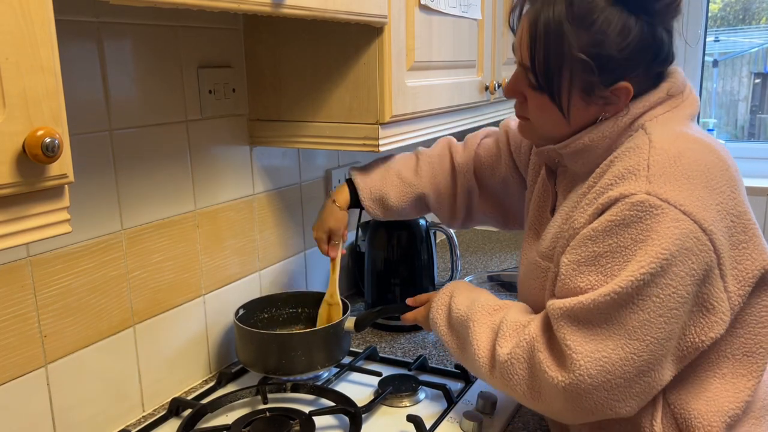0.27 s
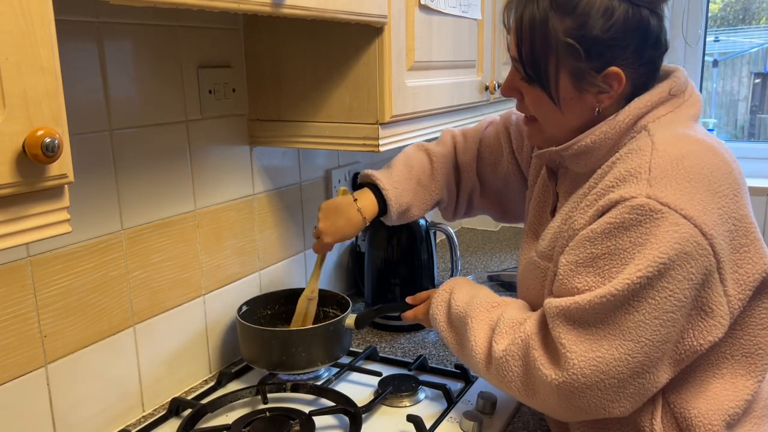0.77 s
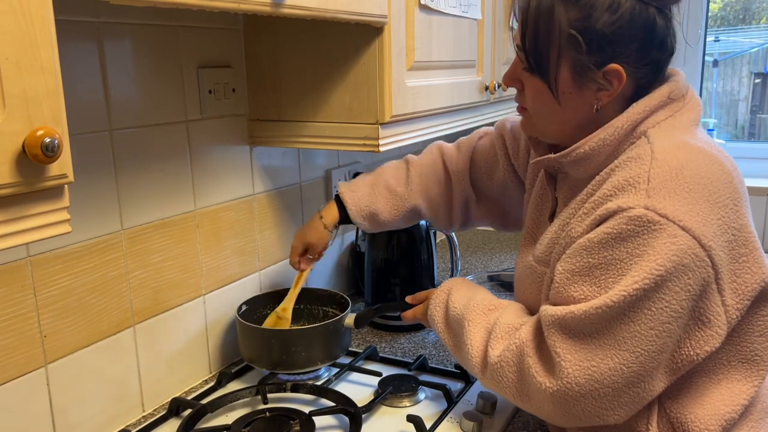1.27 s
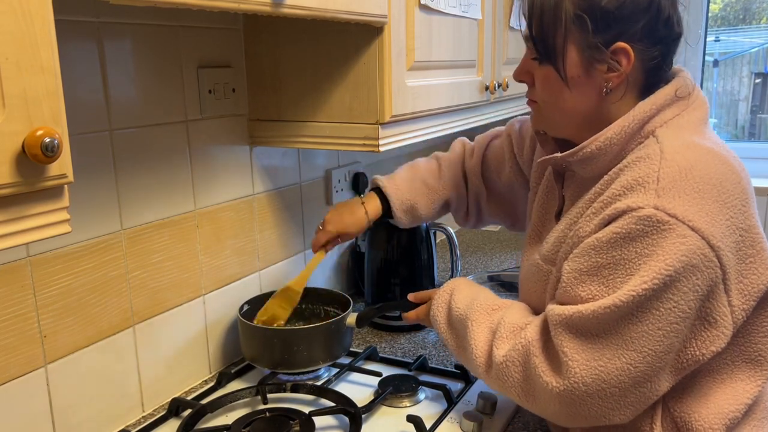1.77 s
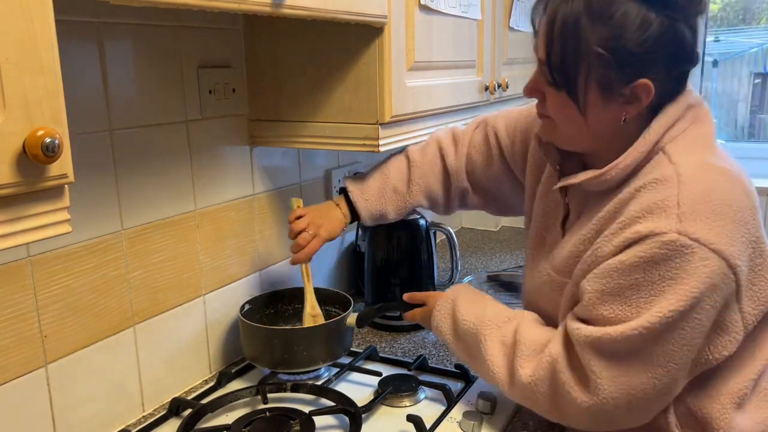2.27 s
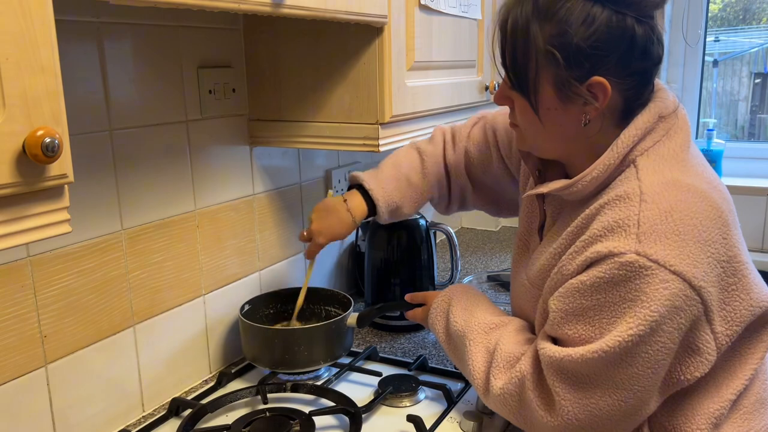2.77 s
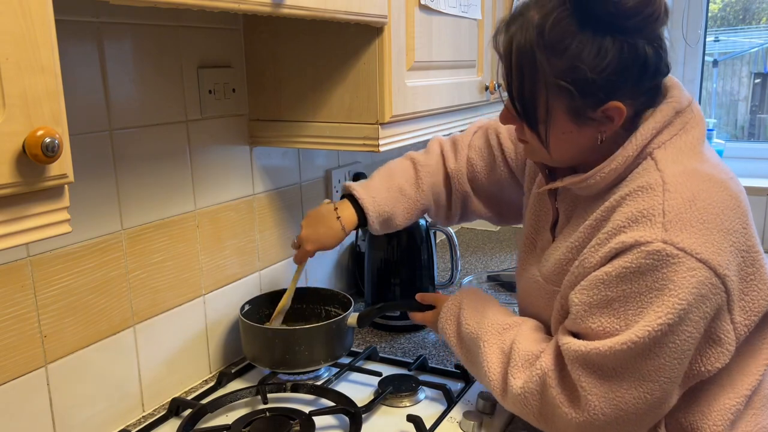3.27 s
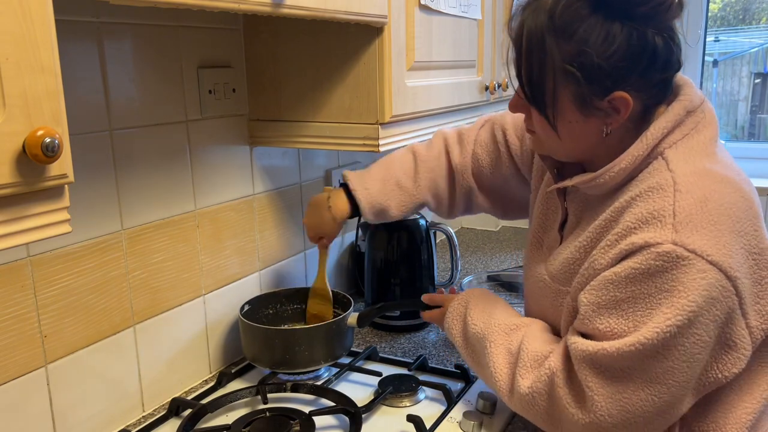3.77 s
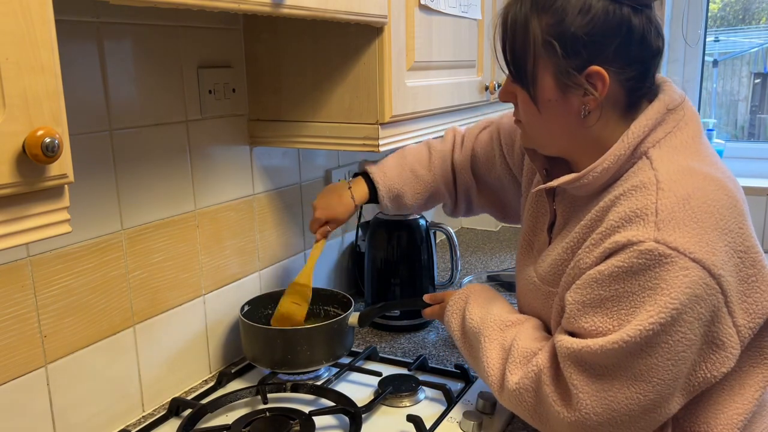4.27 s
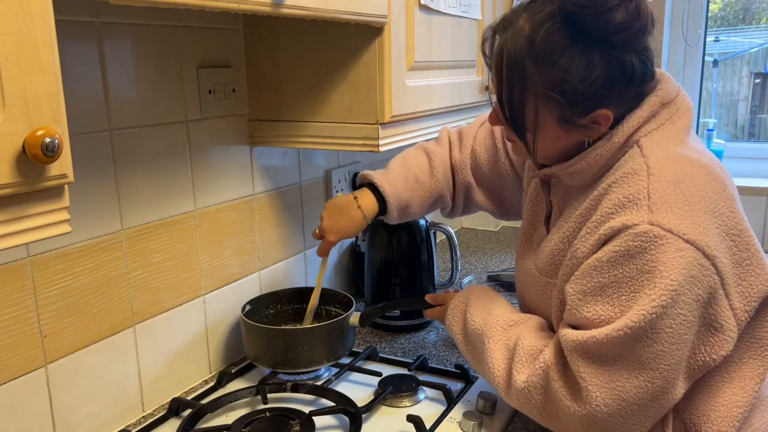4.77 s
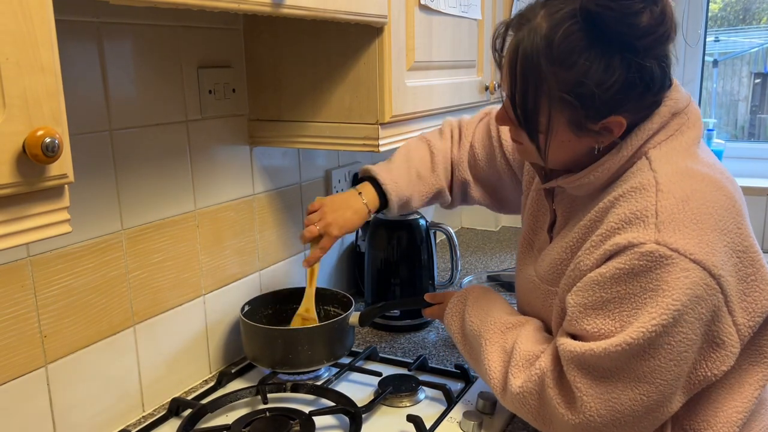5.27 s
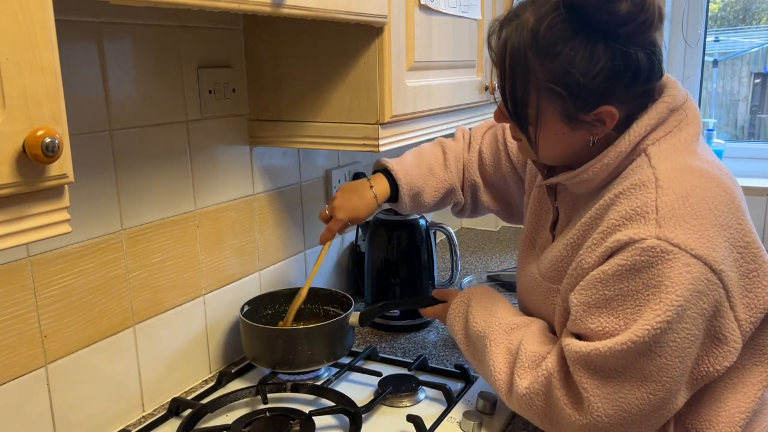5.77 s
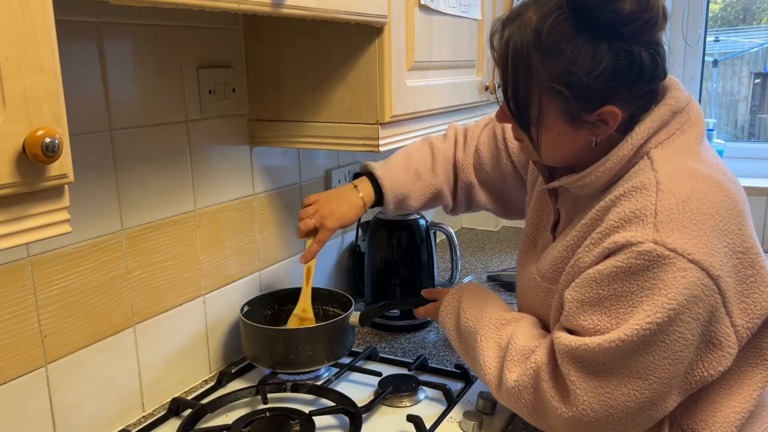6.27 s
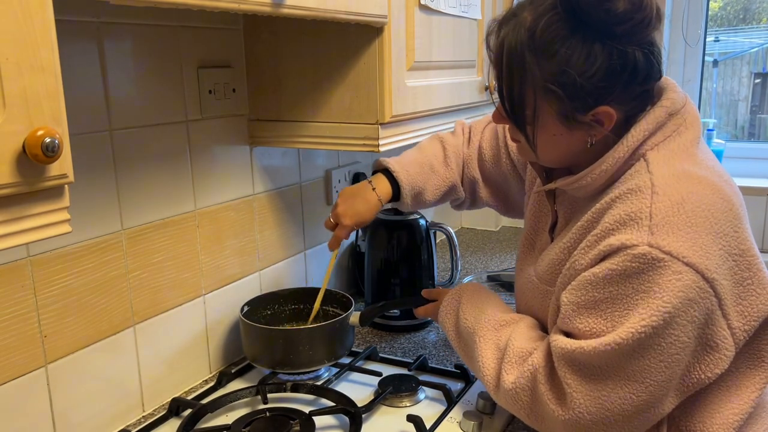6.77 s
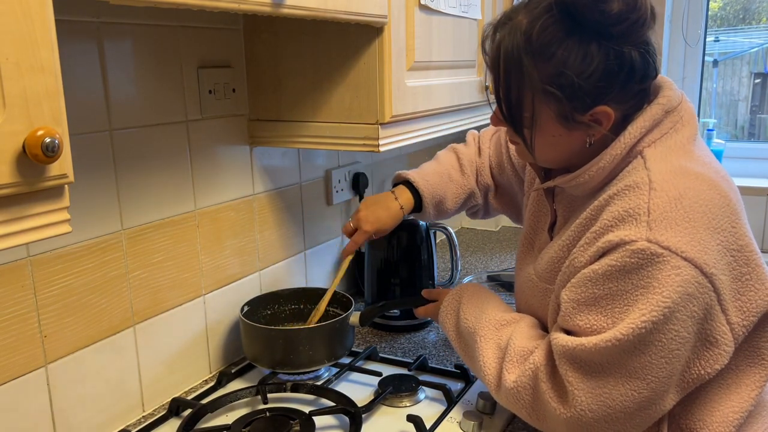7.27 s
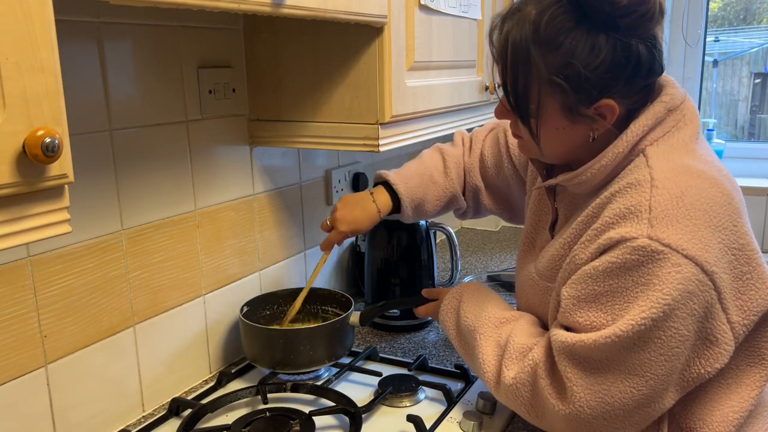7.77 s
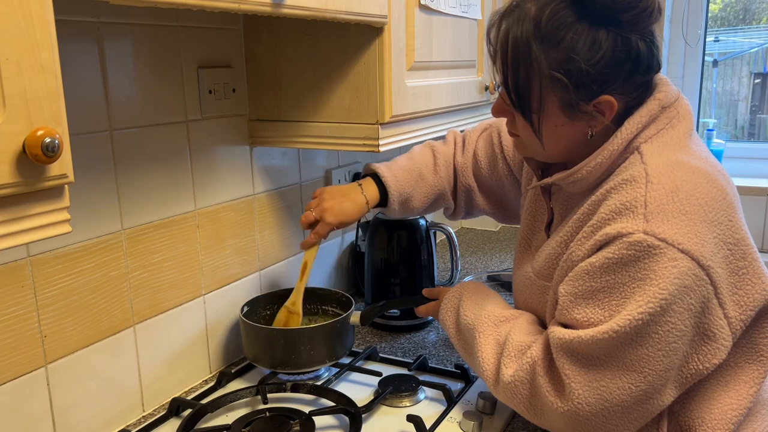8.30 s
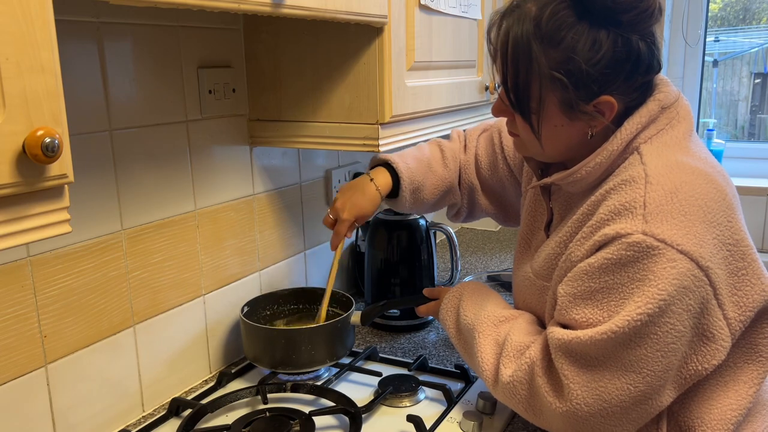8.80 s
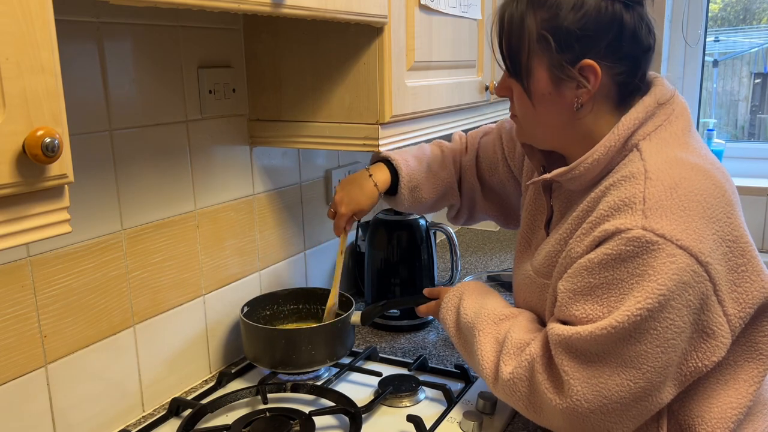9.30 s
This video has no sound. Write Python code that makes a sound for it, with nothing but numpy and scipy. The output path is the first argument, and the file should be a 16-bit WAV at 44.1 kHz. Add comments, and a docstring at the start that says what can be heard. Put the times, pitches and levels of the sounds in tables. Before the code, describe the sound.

A wooden spoon stirs a soft mixture in a metal saucepan, with dry scrapes, sharp little squeaks, light knocks and a faint sizzle over a low hum.

```python
"""In a small kitchen, a wooden spoon stirs a melting, faintly sizzling mixture in a saucepan.
The spoon's rasp is coloured grain noise; its squeaks are stacks of partials that roughen as wood slips on metal.
Knocks are short noise clumps through spoon and pan resonances; the mixture pops, squelches and sizzles.
The pan rocks on its grate with low decaying tones, the hob thuds, and a faint motor hum lies underneath."""
import sys
import numpy as np
from scipy import signal
from scipy.fft import rfft, irfft, next_fast_len
from scipy.io import wavfile
from scipy.ndimage import uniform_filter1d

SR = 44100
rng = np.random.default_rng(int(sys.argv[2]) if len(sys.argv) > 2 else 0)


def wrap_up_sound(samples):
    """Save the sound to the file named by the first command line argument, as 16-bit audio."""
    columns = np.atleast_2d(samples).T
    # keep every value between -1 and 1, then stretch to whole-number steps
    tamed = np.clip(columns, -1, 1)
    steps = np.round(tamed * 32767).astype(np.int16)
    wavfile.write(sys.argv[1], SR, steps)


N = 420713
TIME = np.arange(N) / SR
EDGE_HZ = 15950  # upper edge of the whole scene

# Levels in the tables are before each layer's own trim; colours only set relative balance.
# strokes of the spoon over the base: t/s of greatest pressure, length/s, rasp level/dB, low rub level/dB
STROKES = [(0.2, 0.056, -47.5, -57), (0.305, 0.14, -62, -60), (.58, .04, -66, -64), (0.87, .035, -56, -59),
           (1.127, 0.05, -50, -58), (1.384, 0.031, -49.5, -63), (1.457, 0.096, -52.5, -53),
           (1.574, 0.026, -40.5, -48.5), (1.667, .04, -65, -51.5), (1.906, 0.15, -61, -58),
           (2.084, 0.013, -51, -59), (2.22, 0.084, -58, -63), (2.349, 0.05, -47, -55),
           (2.499, 0.019, -44.5, -52), (2.531, 0.031, -39, -51), (2.77, 0.037, -55, -61),
           (2.858, 0.033, -50.5, -50), (2.975, 0.08, -58, -59), (3.134, 0.039, -53.5, -61),
           (3.802, 0.046, -43.5, -52), (3.888, 0.098, -50, -55), (4.129, 0.039, -42.5, -56),
           (4.893, 0.025, -50.5, -55.5), (4.993, 0.028, -47, -57), (5.057, 0.031, -41.5, -57),
           (5.128, 0.088, -47, -53.5), (5.317, 0.06, -42.5, -53.5), (5.79, 0.037, -45, -50),
           (6.128, 0.038, -45.5, -48.5), (6.178, .025, -51, -60), (6.256, 0.045, -55.5, -53.5),
           (6.326, 0.04, -40, -49), (6.407, 0.049, -50, -50.5), (6.723, 0.033, -53, -57.5),
           (7.47, 0.073, -44.5, -56), (7.521, 0.065, -46, -60), (7.814, .04, -49, -52.5),
           (8.04, .06, -56, -62), (8.19, 0.032, -56, -66), (8.329, .025, -47.5, -55),
           (8.366, 0.028, -46, -71), (8.774, 0.022, -48, -52.5), (9.132, 0.078, -55.5, -60),
           (9.267, 0.037, -57, -73), (9.529, .04, -45.5, -71)]
# the spoon gliding between strokes: rasp level/dB, rub level/dB
GLIDE_LEVELS = (-69.5, -64)
# shares of its length over which a stroke swells and eases
SWELL, EASE = 0.5, 0.5
# colour of the rasp: f/Hz, density/dB per Hz
RASP_COLOUR = [(400, -45), (800, -1), (1250, -5.5), (1900, -4), (2500, 3.5), (3500, 1.5), (4300, -10.5),
               (8000, -8.5), (16000, -40)]
# colour of the low rub through the mixture: f/Hz, density/dB per Hz
RUB_COLOUR = [(25, -17), (70, -20.5), (160, -10.5), (240, -4.5), (320, -4.5), (440, 0), (620, -3.5),
              (820, -15), (1100, -27.5), (2000, -26)]
# resonances of the filled pan: f/Hz, width/Hz, level/dB
PAN_MODES = [(417, 34, 8), (742, 29, 4.5), (805, 110, 5.5), (956, 16, 4.5), (1243, 77, 6), (1390, 76, 10.5),
             (1589, 23, 7), (1684, 59, 11.5), (2078, 55, 6), (3130, 94, -9), (3270, 45, 1), (3716, 130, 3),
             (6260, 120, -11)]
# one curve a squeak: t/s, slip rate f/Hz, roughness (held to 0-1), level/dB
SQUEAK_CURVES = [
    [(0.483, 1295, 0.4, -48.2), (0.488, 1213, 0.17, -26.5), (0.498, 1214, 0.12, -28.5),
     (0.508, 1170, 0.05, -50), (0.53, 1140, 0.3, -56)],
    [(0.546, 1306, 0.6, -37.5), (0.552, 1192, 0.2, -44), (0.571, 1118, 0.34, -56), (0.578, 1226, 0.3, -31),
     (0.587, 1042, 0.36, -30.5), (0.605, 1083, 0.4, -42.5), (0.613, 1020, 0.3, -55)],
    [(0.666, 1034, 0.6, -36), (0.672, 1110, 0.4, -34), (0.682, 1233, 0, -32.5), (0.69, 1260, 0.2, -47),
     (0.712, 1090, 0, -53)],
    [(0.743, 1760, 0.4, -43), (0.748, 1577, 0.2, -38), (0.77, 1658, 0.08, -38.5), (0.8, 1604, 0.06, -38),
     (0.826, 1418, 0.1, -38.5), (0.842, 1120, 0.1, -45.5), (0.858, 998, 0.5, -41), (0.87, 883, 0.65, -35.5),
     (0.885, 970, 1, -54)],
    [(1.049, 1617, 0.8, -41), (1.056, 1514, 0.6, -32.5), (1.073, 1270, 0.4, -31), (1.088, 1530, 0.5, -38),
     (1.104, 1803, 0.25, -41.5), (1.132, 1340, 0.5, -58)],
    [(1.135, 1456, 0.1, -46.6), (1.152, 1823, 0, -45), (1.192, 1745, 0, -38), (1.203, 1820, 0.05, -52),
     (1.216, 1880, 0.08, -38), (1.234, 1650, 0.2, -40.6), (1.248, 1520, 0.2, -59)],
    [(1.362, 1422, 0.87, -45.5), (1.38, 1605, 0.77, -37.5), (1.398, 1840, 0.07, -43),
     (1.415, 2010, 0.03, -28), (1.445, 1992, 0.02, -29), (1.463, 1850, 0.33, -42.5),
     (1.487, 1950, 0, -31.5), (1.51, 1939, 0.03, -36.5), (1.524, 1860, 0.1, -61)],
    [(1.975, 1420, 0.2, -43), (1.984, 1704, 0.06, -29.5), (1.996, 2450, 0.65, -29),
     (2.006, 2160, 0.8, -31.5), (2.016, 1900, 0.2, -39)],
    [(2.023, 1390, 0.2, -46), (2.026, 1385, 0.05, -24), (2.035, 1413, 0.27, -20.9),
     (2.0405, 1687, 0.1, -11), (2.046, 1990, 0.1, -24), (2.055, 2206, 0.5, -29), (2.061, 2060, 0.4, -31)],
    [(2.744, 1810, 0.84, -36.5), (2.756, 1694, 1.2, -27), (2.767, 1794, 0.15, -23.5), (2.785, 1890, 0, -31),
     (2.798, 1854, 0.05, -23), (2.813, 1917, 0.04, -27.5), (2.854, 1887, 0, -25.5),
     (2.871, 1626, 0.74, -34.5), (2.89, 1404, 0.7, -44.6)],
    [(2.925, 1450, 0.5, -39), (2.935, 1518, 0.05, -37), (2.951, 1424, 0.27, -52), (2.965, 1630, 0.1, -41.6),
     (2.982, 1665, 0.1, -42), (3.005, 1624, 0.25, -48), (3.025, 1620, 0.5, -52.2)],
    [(4.67, 1560, 0.5, -37), (4.674, 1500, 0.4, -46), (4.681, 1550, 0.6, -57)],
    [(4.683, 1500, .6, -43), (4.689, 1600, 0.6, -42), (4.699, 1650, 0.8, -55)],
    [(4.837, 1686, 1.1, -50), (4.845, 1823, 0.77, -33.5), (4.856, 1950, 1, -47)],
    [(5.754, 1740, 0.94, -37.5), (5.778, 1683, 1.06, -30.5), (5.824, 1733, 0.9, -30),
     (5.838, 1515, 0.8, -32.5), (5.852, 1764, 0.2, -24), (5.866, 1813, 0.13, -23.5),
     (5.883, 1841, 0.07, -20.5), (5.912, 1765, 0.04, -24.5), (5.931, 1827, 0, -24),
     (5.947, 1858, 0.02, -23), (5.962, 1718, 0.05, -31), (5.999, 1660, 0.4, -34.5), (6.014, 1830, 0, -23.3),
     (6.027, 1852, 0, -27), (6.037, 1740, 0.03, -25), (6.055, 1870, 0, -28), (6.082, 1750, 0.03, -28.5),
     (6.097, 1676, 0.5, -35), (6.116, 1533, 0.5, -39), (6.14, 1435, 0.84, -45)],
    [(6.939, 1610, 1.1, -40), (6.95, 1780, 0.45, -25), (6.962, 1927, 0, -35), (6.973, 1880, 0.1, -41),
     (6.981, 1743, 0.66, -25.5), (7.007, 1832, 0.4, -26.7), (7.03, 1898, 0.17, -42.5),
     (7.048, 1894, 0.44, -44.8)],
    [(7.211, 1800, 0.5, -53), (7.218, 1813, 0.15, -28), (7.234, 1816, 1, -31), (7.243, 1310, 0.32, -29.5),
     (7.262, 1530, 0.47, -30), (7.28, 1580, 0.24, -22.5), (7.302, 1722, 0.23, -25.5),
     (7.324, 1590, 0.15, -20.5), (7.345, 1584, 0, -23.5), (7.366, 1580, 0.1, -23.5),
     (7.384, 1806, 0.23, -24), (7.404, 1902, 0.05, -28.5), (7.435, 1928, 0.06, -26), (7.468, 1982, 0, -24),
     (7.5, 1946, 0, -26.5), (7.53, 1936, 0, -29), (7.558, 1894, 0.37, -30.5), (7.575, 1840, 0.3, -48)],
    [(7.655, 1730, 0.53, -44), (7.672, 1806, 0.13, -33.5), (7.698, 1870, 0, -39.5),
     (7.73, 1795, 0.18, -29.5), (7.765, 1738, 0.06, -33.5), (7.795, 1668, 0.15, -36.6),
     (7.82, 1630, 0.3, -48)],
]
# how the spoon is held and where it touches, one row a squeak:
# brightness/dB per octave, ring f/Hz, ring level/dB, shrill f/Hz, shrill level/dB, left minus right level/dB
GRIPS = [(-8, 2600, 17.5, 12300, 30, 1), (0.5, 1870, 28.5, 11200, 19, -0.5),
         (-4.5, 2060, 17.5, 11200, 22, 0.5), (-4, 1920, 22, 14800, 44, -2), (1.5, 4040, 14, 8800, 11.5, 1),
         (-5, 1700, 10.5, 10000, 15, 2), (0, 2460, 23.5, 9900, 12.5, -1), (-4.5, 3200, 7, 7500, 2, -2),
         (-4, 3400, 18.5, 6850, 15.5, -1.5), (2.5, 4530, 23, 9400, 13, 1.7), (5, 4650, 4, 8900, -14, 0),
         (2, 4650, 8, 8900, 6, -1), (1.5, 1600, 1, 8000, 6, -2), (1.5, 1800, 11.5, 6400, 9, -1),
         (6.5, 5650, 10.5, 9740, 7, 1), (1, 5170, 14, 10700, 18, 1), (6, 4860, 18, 10280, 10.5, 1),
         (-3.5, 3920, 11, 13000, 11, .5)]
# colour that all squeaks share: f/Hz, level/dB
SQUEAK_COLOUR = [(1000, 2.2), (2000, -0.5), (2700, -0.5), (3700, 2.5), (4200, -3.5), (4750, 1.5),
                 (5100, -4), (5500, 4.5), (6100, -15), (7200, -0.5), (8200, -10.5), (9600, -8.5),
                 (11000, -16), (13000, -21.5), (16000, -35)]
# harder pressing brightens a squeak: dB per octave for each dB of level
PRESS_TILT = 0.14
# extra ring while the wood catches and lets go: dB at full roughness
CATCH_DB = 6
# dry hiss of the wood tearing loose during a squeak: f/Hz, density/dB per Hz
HISS_COLOUR = [(2000, -19), (4500, -3), (7000, -3), (10500, -8), (12500, 0.5), (14500, -4), (16000, 5)]
# short knocks and flicks of the spoon: t/s, length/s, blow level/dB, hardness/dB per octave, wet splash level/dB
KNOCKS = [(0.047, .025, -54, -3.5, -57), (.07, 0.011, -48, 3.5, -37.5), (0.144, 0.034, -48, -2, -45.5),
          (0.22, 0.019, -60.5, 9, -46.5), (0.342, 0.0058, -58, 13.5, -69), (0.388, 0.022, -51, -0.5, -74),
          (0.635, 0.017, -55, -2, -57), (1.625, 0.0095, -35.5, 0, -30), (1.706, 0.012, -46, 3, -38),
          (1.785, 0.018, -50, 2.5, -37.5), (1.871, 0.013, -46.5, 4, -36.5), (2.171, .01, -48, 0, -53),
          (2.596, 0.013, -53, 5.5, -62), (2.923, .014, -47, 3.5, -46), (3.062, 0.015, -46, 0, -41.5),
          (3.115, .004, -46, -5, -45), (3.257, 0.014, -60.5, -3, -56), (3.627, 0.0067, -64.5, 16, -57),
          (4.159, .013, -46, 3, -38), (4.68, 0.0076, -53, 11.5, -43), (4.797, 0.018, -51.5, 6, -39),
          (4.837, 0.03, -51.5, 3, -48), (5.067, 0.0046, -38.5, -0.5, -62), (5.241, .007, -44.5, 0.5, -56),
          (5.979, 0.017, -50, -3.5, -56), (6, 0.0069, -33, 2, -49), (6.215, 0.011, -50.5, 0.5, -52),
          (6.442, 0.017, -45, 2.5, -35), (6.521, .018, -49.5, 2, -45), (6.604, 0.0039, -48, 8.5, -31.5),
          (6.651, 0.02, -55, 9, -44.5), (7.801, 0.032, -48, 4.5, -37), (7.872, 0.014, -48.5, 0, -57),
          (8.012, .013, -59, 7, -44), (8.048, 0.0059, -46.5, -0.5, -57), (8.234, 0.011, -61.5, 14, -42.5),
          (8.398, 0.0053, -42, 2, -39), (8.593, .0055, -52, 6, -60), (9.225, 0.007, -55, 17, -36),
          (9.441, 0.014, -49.5, 2, -35), (9.487, .009, -53, 9, -59), (9.517, 0.0075, -42.5, 3.5, -42)]
# where pan body, wall, wood and splash sound in a knock: low f/Hz, high f/Hz
KNOCK_BANDS = [(330, 1380), (1150, 3630), (3000, 5800), (5300, 12500)]
# resonances of the wooden spoon when it knocks: f/Hz, width/Hz, level/dB
SPOON_MODES = [(1490, 97, 0), (1950, 200, 9), (2880, 1300, 4.5), (3890, 360, -1), (4750, 94, 0),
               (6230, 430, -4), (11600, 1300, -5.5)]
# the pan rocks on the grate: t/s, level/dB
ROCKS = [(1.636, -36), (1.711, -38.5), (2.192, -61), (3.068, -45), (5.857, -46), (6.007, -37), (6.221, -46),
         (6.527, -40.5)]
# tones of the grate: f/Hz, level/dB, t60/s
GRATE_MODES = [(467, 6, 0.047), (448, -8.5, 0.17), (362, -10, 0.13), (249.5, -6.5, 0.095)]
# dull pushes of the spoon into the hob: t/s, level/dB, pitch f/Hz
THUDS = [(2.082, -48, 126), (2.545, -55, 55), (5.765, -43, 85.1), (5.775, -43, 208), (5.808, -43, 53),
         (6.443, -53, 70)]
# sizzle as hot mixture is turned over and settles: t/s, level/dB
SIZZLE_CURVE = [(0, -52), (.4, -55), (1.2, -56), (1.6, -45.5), (2.1, -50.5), (2.65, -46.5), (2.95, -53),
                (3.6, -55), (4.1, -50), (4.7, -53.5), (5.1, -48), (5.7, -53.5), (6.2, -48), (6.8, -53),
                (7.5, -54), (7.7, -42.5), (8.2, -48.5), (9.53, -49)]
# colour of the sizzle: f/Hz, density/dB per Hz
SIZZLE_COLOUR = [(500, -4), (1500, -3.5), (3000, -2), (5500, 1), (8000, -1), (10500, 0), (13000, 0.5),
                 (16000, 0)]
# the motor comes up to speed: t/s, f/Hz
HUM_PITCH = [(0, 461), (.3, 482), (.6, 497), (.85, 500)]
# lines of the hum: multiple of the pitch, level/dB
HUM_LINES = [(1, 1), (2, -10.5)]
# the hum fades now and then: t/s, half length/s, depth/dB
HUM_DIPS = [(4.794, .04, -18), (7.196, 0.08, -30), (8.56, 0.054, -43), (8.938, 0.089, -32),
            (9.392, 0.056, -28)]
# likeness of left and right in all grain noise: f/Hz, likeness (0-1)
STEREO_LIKENESS = [(60, 0.6), (130, 0.32), (300, 0.86), (650, 0.75), (1400, 0.38), (2400, 0.52),
                   (4400, 0.04), (8000, 0), (15000, 0.12)]
# the kitchen's ring: f/Hz, t60/s
ROOM_DECAY = [(200, 0.15), (1500, 0.083), (5000, 0.096), (14000, 0.073)]


def amp(db):
    """Decibels to gain."""
    return 10 ** (np.asarray(db) / 20)


def unit(x):
    """Scales to rms 1."""
    return x / np.sqrt(np.mean(x ** 2) + 1e-20)


def read(points, hz):
    """Reads a spectrum on a log-frequency axis."""
    f, value = np.transpose(points)
    return np.interp(np.log(hz + 1), np.log(f + 1), value)


def follow(rows, t):
    """Every column of a curve table at the times t."""
    s, *columns = np.transpose(rows)
    return [np.interp(t, s, column) for column in columns]


def add(mix, s, sound):
    """Adds a sound into the mix at time s."""
    part = mix[..., max(round(s * SR), 0):][..., :sound.shape[-1]]
    part += sound[..., :part.shape[-1]]


def wander(size, hz):
    """Random drift of rms 1, rolling off smoothly around hz."""
    n = next_fast_len(size + 2000)
    slow = np.exp(-(np.fft.rfftfreq(n, 1 / SR) / hz) ** 2)
    drift = irfft(rfft(rng.standard_normal(n)) * slow, n)
    return unit(drift[:size])


def grains(size, colour, per_s, spread_db, wash):
    """Tiny random ticks over a wash of finer ones, coloured and heard at two microphones."""
    n = next_fast_len(size)
    hz = np.fft.rfftfreq(n, 1 / SR)
    tick_gain = amp(spread_db * np.minimum(rng.exponential(1, n), 4))
    ticks = (rng.random(n) < per_s / SR) * tick_gain
    left, other = rfft(rng.standard_normal((2, n)) * (unit(ticks) + wash))
    same = np.clip(read(STEREO_LIKENESS, hz), -1, 1)
    right = same * left + np.sqrt(1 - same ** 2) * other
    return unit(irfft(np.array([left, right]) * colour(hz), n)[:, :size])


def resonance_gain(modes, hz):
    """Resonant peaks standing out of an even response, summed as power."""
    peaks = sum(amp(db) ** 2 / (1 + (2 * (hz - f) / width) ** 2) for f, width, db in modes)
    return np.sqrt(.5 + peaks)


def pressure():
    """Gains of rasp and rub over time: each stroke swells and eases above a light glide."""
    t = TIME[::SR // 1000]
    power = amp(GLIDE_LEVELS)[:, None] ** 2 * np.ones(len(t))
    for s, length, *part_db in STROKES:
        u = (t - s) / length
        shape = 2 * np.exp(-np.logaddexp(-u / SWELL, u / EASE))
        power = power + (amp(part_db)[:, None] * shape) ** 2
    return [np.interp(TIME, t, np.sqrt(p)) for p in power]


def stirring(rasp, rub, rasp_db=-3.5, rub_db=-1, judder_db=3.0):
    """The grain of the wood ticks across the base; the pressure of the hand judders."""
    # firmer strokes judder more
    pressing = np.clip((20 * np.log10(rasp) + 63) / 12, .15, 1)
    judder = judder_db * pressing * wander(N, 62)

    def rasp_colour(hz):
        return amp(read(RASP_COLOUR, hz)) * resonance_gain(PAN_MODES, hz)

    def rub_colour(hz):
        return amp(read(RUB_COLOUR, hz)) * resonance_gain(PAN_MODES, hz)

    high = grains(N, rasp_colour, per_s=1000, spread_db=3.7, wash=0.66)
    low = grains(N, rub_colour, per_s=900, spread_db=1.9, wash=1.0)
    return high * rasp * amp(rasp_db + judder) + low * rub * amp(rub_db + judder)


def overtone(hz, rough, tilt_db, ring_hz, ring_db, shrill_hz, shrill_db,
             ring_width_hz=800, shrill_width_hz=1300):
    """Gain of a partial: the shared colour plus the two bands that the grip favours."""
    ring = (ring_db + CATCH_DB * rough) * np.exp(-((hz - ring_hz) / ring_width_hz) ** 2)
    shrill = shrill_db * np.exp(-((hz - shrill_hz) / shrill_width_hz) ** 2)
    tilt = tilt_db * np.log2(hz / 4000)
    return amp(read(SQUEAK_COLOUR, hz) + tilt + ring + shrill) * (hz < EDGE_HZ)


def squeak(rows, grip, jitter=0.0553, jitter_hz=420, shimmer_db=3.0, flutter_db=2.5,
           raggedness=0.62, edge_s=0.0018, lag_rad=1.65, sway_rad=0.36):
    """Stick and slip: a stack of partials, pure while the grip is steady, ragged as it catches and lets go."""
    t = np.arange(rows[0][0] - edge_s, rows[-1][0] + edge_s, 1 / SR)
    hz, rough, level_db = follow(rows, t)
    rough = np.clip(rough, 0, 1)
    slip_hz = hz * (1 + jitter * rough * wander(len(t), jitter_hz))
    phase = 2 * np.pi * np.cumsum(slip_hz) / SR

    partial_hz = np.arange(1, 14)[:, None] * hz
    pressed_db = PRESS_TILT * (level_db - level_db.mean()) * np.log2(partial_hz / hz)
    partials = overtone(partial_hz, rough, *grip) * amp(pressed_db)
    gains = amp(level_db) * partials / np.linalg.norm(partials, axis=0)

    out = np.zeros((2, len(t)))
    ragged = raggedness * rough
    for k, gain in enumerate(gains, 1):
        # uneven slips smear each partial into a skirt of noise
        skirt = wander(len(t), 680) + 1j * wander(len(t), 800)
        line = (1 + ragged * skirt) / np.sqrt(1 + 2 * ragged ** 2) * np.exp(1j * k * phase)
        # short waves reach the left microphone out of step, and the angle sways as the spoon moves
        angle = np.tanh(k * hz / 3000) * (lag_rad + sway_rad * wander(len(t), 20))
        flutter = amp(flutter_db * wander(len(t), 110))
        out += np.sqrt(2) * gain * flutter * np.real([line * np.exp(-1j * angle), line])
    fade = np.clip(np.minimum(t - t[0], t[-1] - t) / edge_s, 0, 1)
    shimmer = amp(shimmer_db * rough * (wander(len(t), 220) - 0.97))
    return t[0], out * fade * shimmer


def hiss(rows, level_db=-13, steady=0.018):
    """The wood also scrapes while it squeaks, most of all when the slips are ragged."""
    t = np.arange(rows[0][0], rows[-1][0], 1 / SR)
    _, rough, squeak_db = follow(rows, t)
    share = np.sqrt(np.clip(rough, steady, 1))
    scrape = grains(len(t), lambda hz: amp(read(HISS_COLOUR, hz)), per_s=3000, spread_db=2.5, wash=.6)
    return t[0], scrape * share * amp(squeak_db + level_db)


def squeaks(hiss_per_tilt_db=0.18):
    """All squeaks, each leaning to the side where the spoon touches; a bright grip hisses more."""
    out = np.zeros((2, N))
    for rows, (*grip, lean_db) in zip(SQUEAK_CURVES, GRIPS):
        s, tone = squeak(rows, grip)
        add(out, s, tone * amp([[lean_db / 2], [-lean_db / 2]]))
        s, scrape = hiss(rows)
        add(out, s, scrape * amp(hiss_per_tilt_db * grip[0]))
    return out


def knock_colour(hz, part_db, ringing=0.44):
    """Body, wall, wood and splash bands of a blow, shaped by spoon and partly by pan."""
    body = resonance_gain(SPOON_MODES, hz) * resonance_gain(PAN_MODES, hz) ** ringing
    power = 0
    for db, (low, high) in zip(part_db, KNOCK_BANDS):
        band = body / np.sqrt((1 + (low / (hz + 1)) ** 8) * (1 + (hz / high) ** 8))
        power = power + (amp(db) * unit(band)) ** 2
    return np.sqrt(power)


def knocks(level_db=-1.5, rise_s=0.00094, tail_db=-15, tail_s=0.02):
    """Each knock is a brief clump of slips that rings the pan and flicks the mixture."""
    out, t = np.zeros((2, N)), np.arange(SR // 6) / SR
    octaves = np.log2(KNOCK_BANDS[:-1]).mean(1)
    for s, length, blow_db, hardness_db, splash_db in KNOCKS:
        # hardness tilts the three solid bands around the wall band
        part_db = [*(blow_db + hardness_db * (octaves - octaves[1])), splash_db]
        clump = np.exp(-(t / (1.08 * length)) ** 2)
        tail = amp(tail_db) * np.exp(-t / tail_s)
        shape = np.minimum(t / rise_s, 1) * np.hypot(clump, tail)
        slips = grains(len(t), lambda hz: knock_colour(hz, part_db), per_s=4000, spread_db=0.43, wash=0.31)
        add(out, s, np.linalg.norm(amp(part_db)) * shape * slips)
    return amp(level_db) * out


def squelch(rasp, level_db=-9.0, low_hz=780, high_hz=1700, per_s=260, cycles=3, spread_db=2, count=24):
    """Small air pockets pop in the thick mixture as the spoon drags through it."""
    t, out = np.arange(SR // 25) / SR, np.zeros(N)
    for hz in np.geomspace(low_hz, high_hz, count):
        pop = (1 - np.exp(-t * hz)) * np.exp(-t * hz / cycles) * np.sin(2 * np.pi * hz * t)
        starts = rng.random(N) < per_s / count / SR
        sizes = starts * amp(spread_db * np.minimum(rng.exponential(1, N), 3))
        out += signal.oaconvolve(sizes, pop)[:N]
    return unit(out) * rasp * amp(level_db)


def pan_ring(x, ring_db=-7):
    """The pan's resonances, as decaying cosines, ring on briefly after each blow or pop."""
    t, ring = np.arange(SR // 10) / SR, 0
    for hz, width, db in PAN_MODES:
        decay = 2 * np.pi * width / SR * np.exp(-np.pi * width * t)
        ring = ring + amp(db) * decay * np.cos(2 * np.pi * hz * t)
    return x + amp(ring_db) * signal.oaconvolve(x, ring[None], axes=1)[:, :N]


def rocking(rise_s=0.0047):
    """The pan tips and settles on its grate, which rings low and briefly."""
    out, t = np.zeros(N), np.arange(SR // 5) / SR
    ring = sum(amp(db - 60 * t / t60) * np.sin(2 * np.pi * hz * t) for hz, db, t60 in GRATE_MODES)
    for s, db in ROCKS:
        add(out, s, amp(db) * (1 - np.exp(-t / rise_s)) * ring)
    return out


def thuds(rise_s=0.0022, fall_s=0.0071):
    """Heavily damped bumps of the hob: low sines that die away at once."""
    out, t = np.zeros(N), np.arange(SR // 5) / SR
    shape = (1 - np.exp(-t / rise_s)) * np.exp(-t / fall_s)
    for s, db, hz in THUDS:
        add(out, s, amp(db) * shape * np.sin(2 * np.pi * hz * t))
    return out


def sizzle(rasp, level_db=-1.04, stirred_db=-7, drift_db=1.72, lean_db=.5):
    """Countless tiny bubbles burst in the hot mixture, louder under each stroke."""
    curve_db, = follow(SIZZLE_CURVE, TIME)
    bubbles = grains(N, lambda hz: amp(read(SIZZLE_COLOUR, hz)), per_s=4000, spread_db=2.6, wash=2.6)
    simmer = amp(curve_db + level_db + drift_db * wander(N, 11) + .5 * wander(N, 44.0))
    return bubbles * np.hypot(simmer, rasp * amp(stirred_db)) * amp([[lean_db], [-lean_db]])


def hum(level_db=-66.0, waver_hz=1.177):
    """A small motor's slightly wavering tone and its octave."""
    dips_db = sum(depth_db * np.exp(-((TIME - s) / half) ** 2) for s, half, depth_db in HUM_DIPS)
    hz, = follow(HUM_PITCH, TIME)
    turns = np.cumsum(hz + waver_hz * wander(N, 12.1)) / SR
    tone = sum(amp(db) * np.sin(2 * np.pi * k * turns) for k, db in HUM_LINES)
    return np.sqrt(2) * tone * amp(level_db + dips_db + 2.2 * wander(N, 24))


def kitchen(x, near_db, far_db, near_s=0.0038, even_hz=90):
    """Quick echoes off the pan wall and tiles, then a short ring of the room; they smear but hardly colour."""
    t, bins_hz = np.arange(SR // 3) / SR, np.fft.rfftfreq(SR // 3, 1 / SR)
    echoes = rng.standard_normal((2, 2, len(t))) * (rng.random((2, 2, len(t))) < 6000 / SR)
    near, far = echoes
    near = near * (t > .0004) * np.exp(-t / near_s)
    # each frequency of the room dies away at its own pace
    hz, frame_s, z = signal.stft(far * (t > .006), SR, nperseg=256)
    decay = amp(-60 * frame_s / read(ROOM_DECAY, hz)[:, None])
    far = signal.istft(z * decay, SR, nperseg=256)[1][:, :len(t)]
    left, other = rfft((amp(near_db) * unit(near) + amp(far_db) * unit(far)) / np.sqrt(len(t)))
    # long waves reach both microphones alike
    same = 1 / (1 + (bins_hz / 3200) ** 2)
    right = same * left + np.sqrt(1 - same ** 2) * other
    paths = 1 + np.array([left, right])  # the 1 is the direct sound
    # level out the broad colour, leaving the fine echo pattern
    broad = uniform_filter1d((abs(paths) ** 2).mean(0), int(even_hz / bins_hz[1]))
    response = irfft(paths / np.sqrt(broad), len(t))[:, :len(t) // 2]
    return signal.oaconvolve(x, response, axes=1)[:, :N]


def scene():
    """Spoon and pan in the kitchen, over the sizzle and the hum."""
    rasp, rub = pressure()
    struck = pan_ring(knocks() + squelch(rasp))
    spoon = kitchen(struck + stirring(rasp, rub), near_db=-1.5, far_db=-13.0)
    squeaking = kitchen(squeaks(), near_db=1.5, far_db=-14)
    return squeaking + spoon + rocking() + thuds() + sizzle(rasp) + hum()


def record(dry):
    """A linear-phase low-pass limits the band at EDGE_HZ."""
    low_pass = signal.firwin(511, EDGE_HZ, window=("kaiser", 9), fs=SR)
    return signal.oaconvolve(dry, low_pass[None], "same")


dry = scene()
out = record(dry)
wrap_up_sound(out)
```